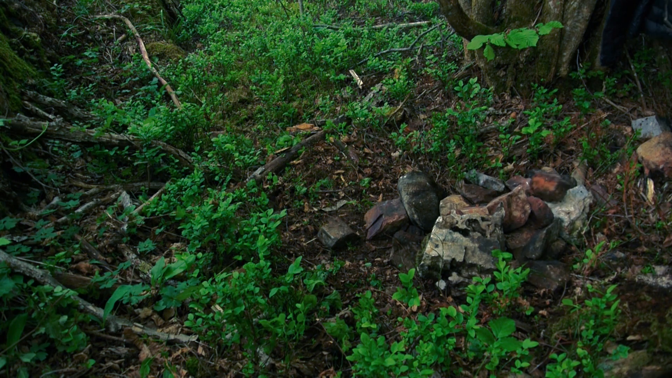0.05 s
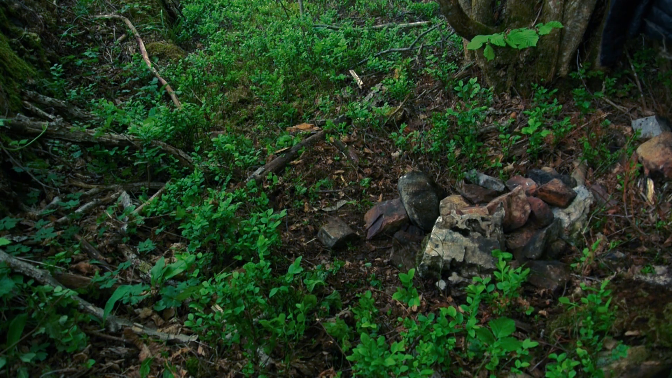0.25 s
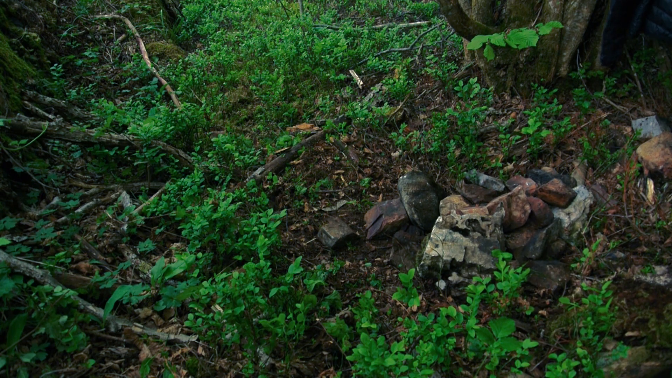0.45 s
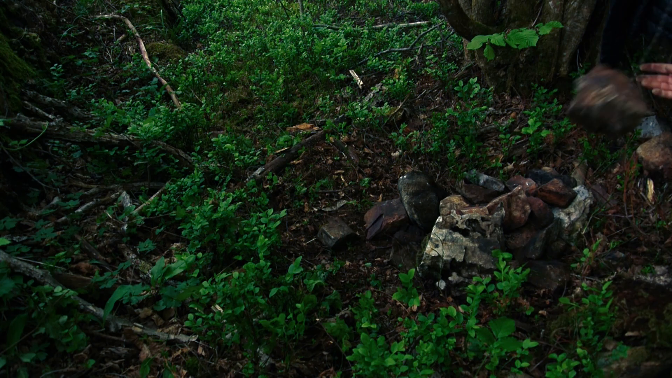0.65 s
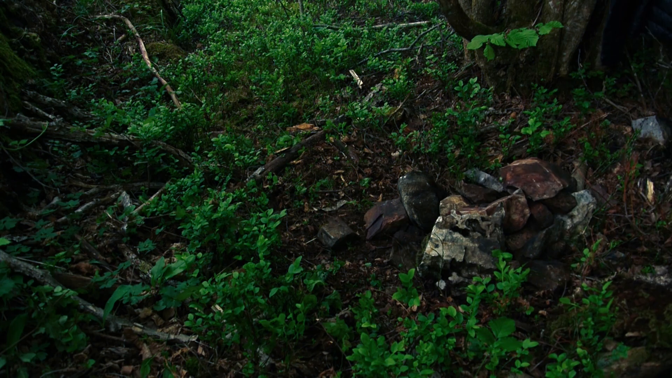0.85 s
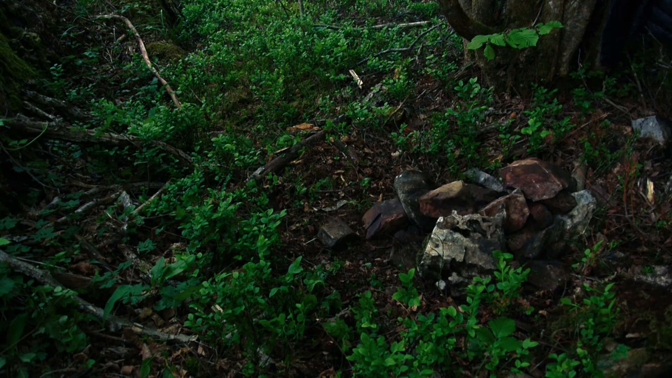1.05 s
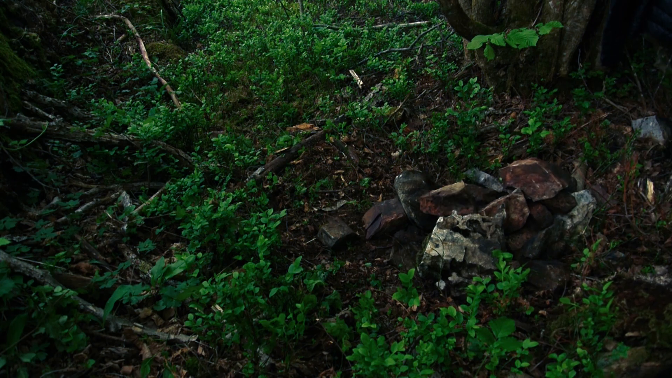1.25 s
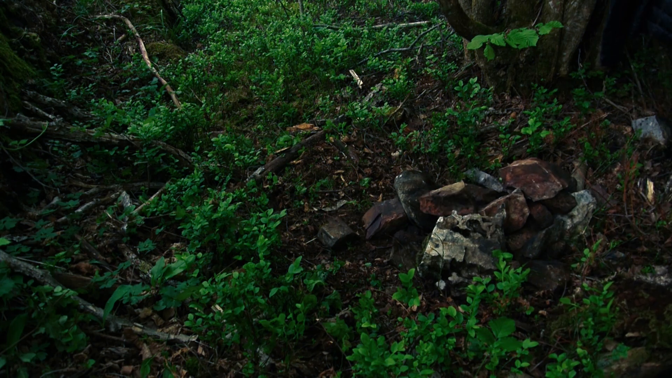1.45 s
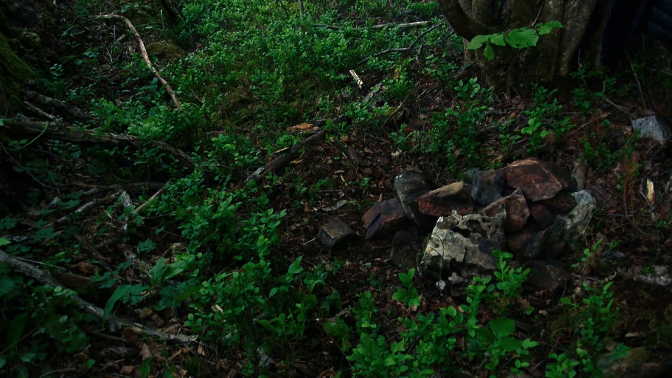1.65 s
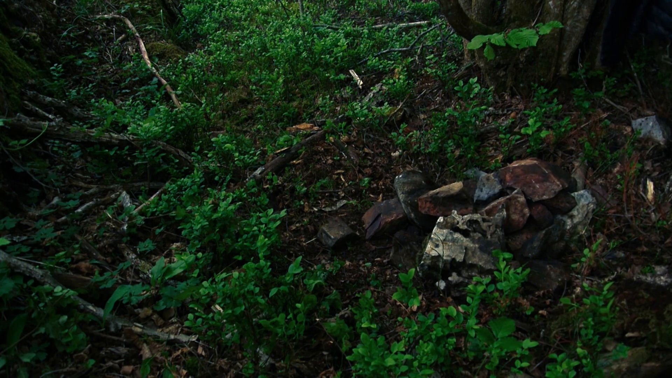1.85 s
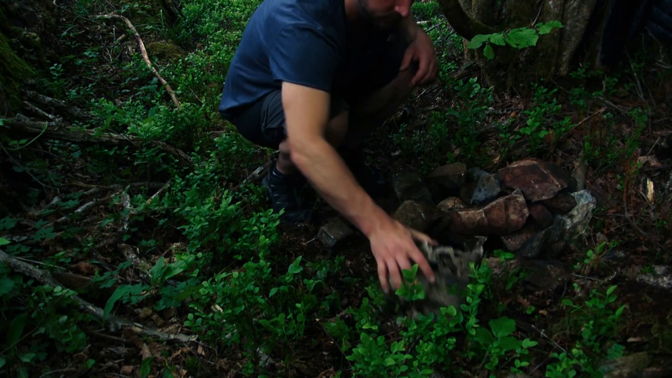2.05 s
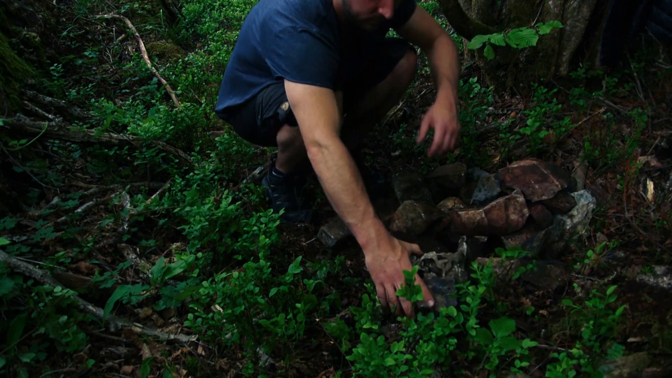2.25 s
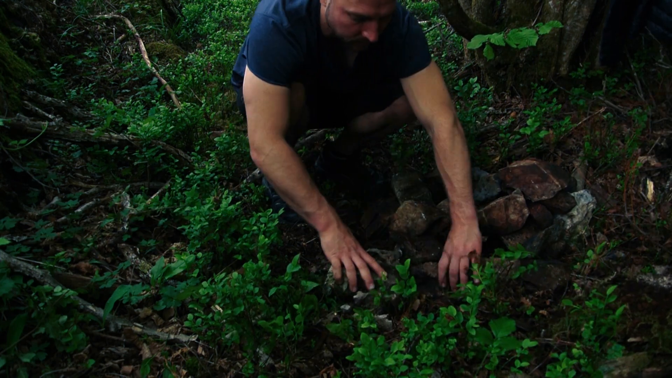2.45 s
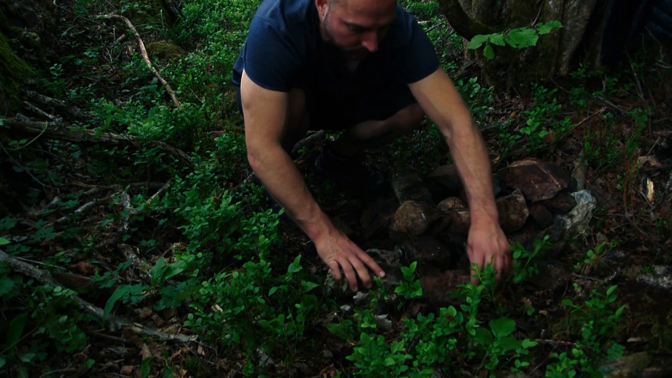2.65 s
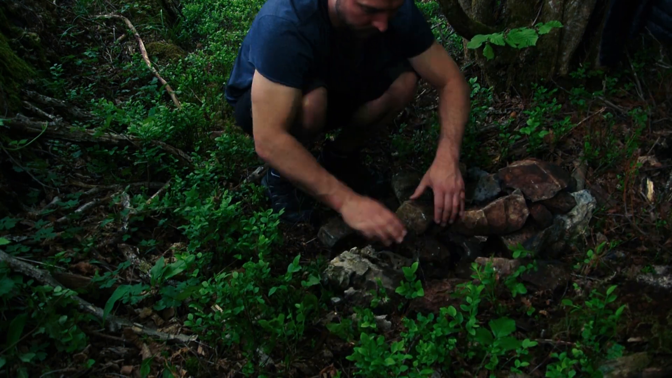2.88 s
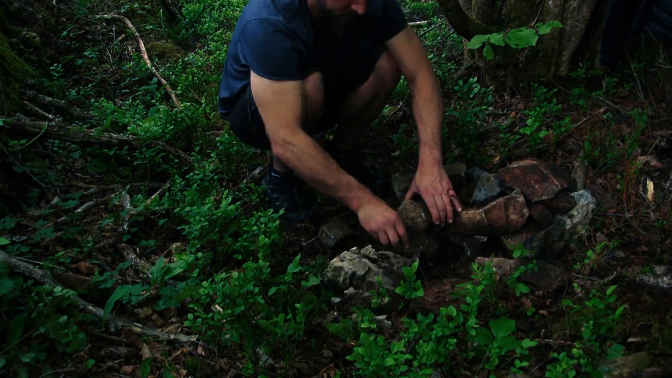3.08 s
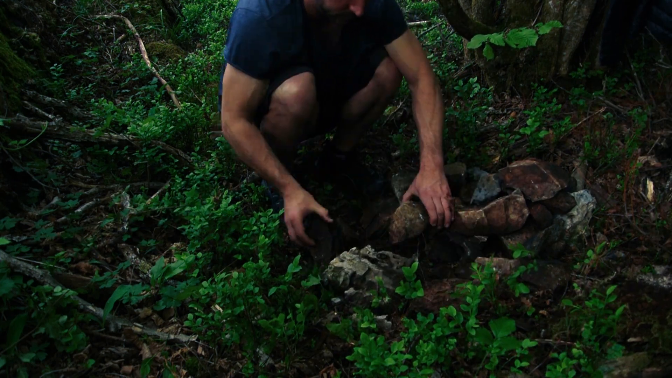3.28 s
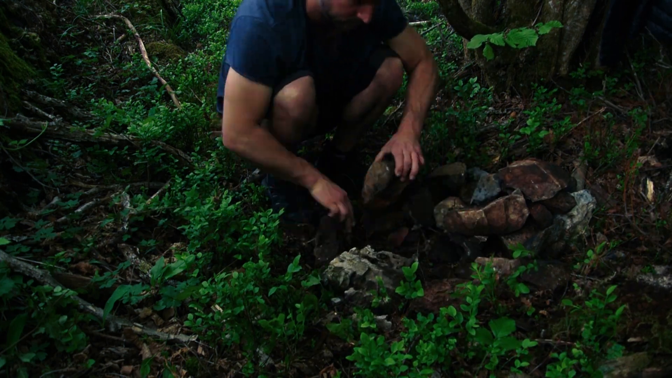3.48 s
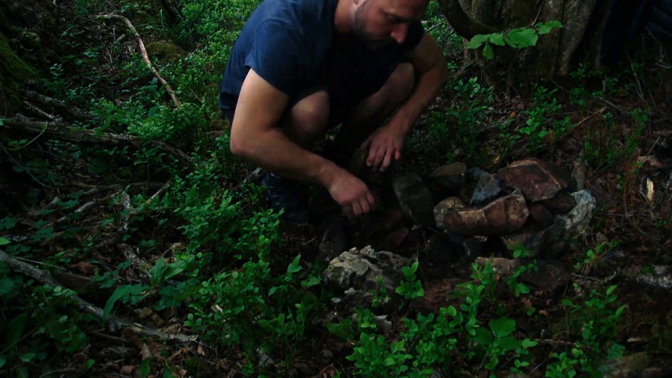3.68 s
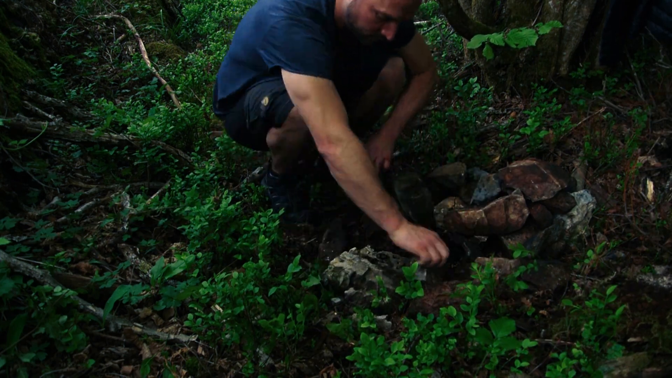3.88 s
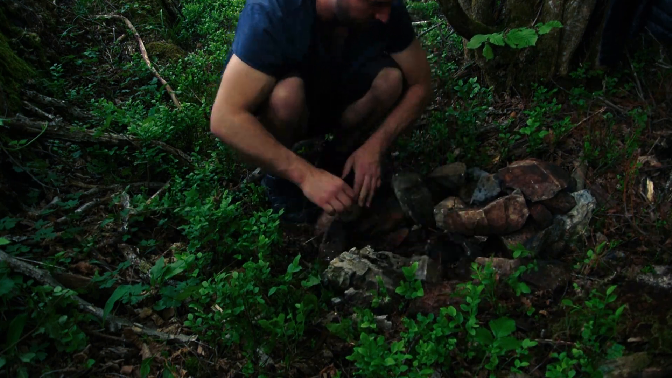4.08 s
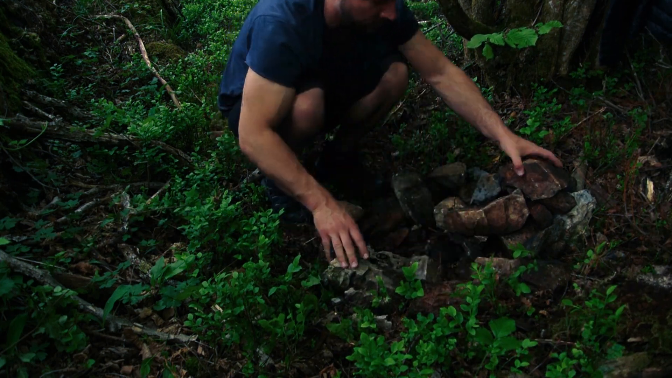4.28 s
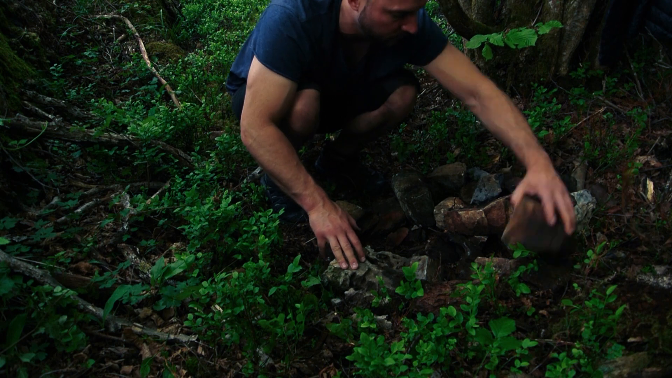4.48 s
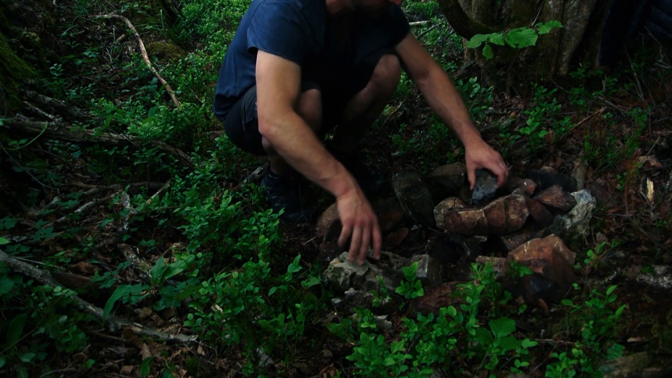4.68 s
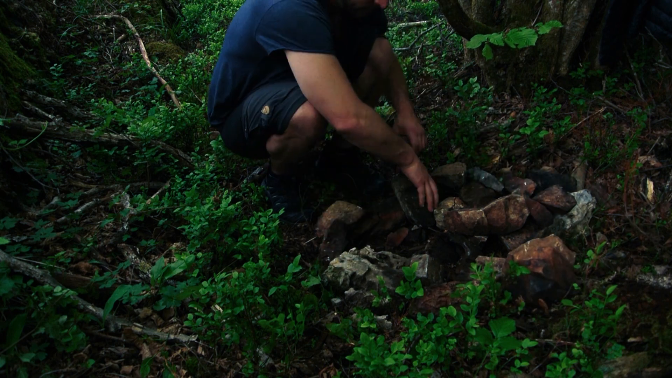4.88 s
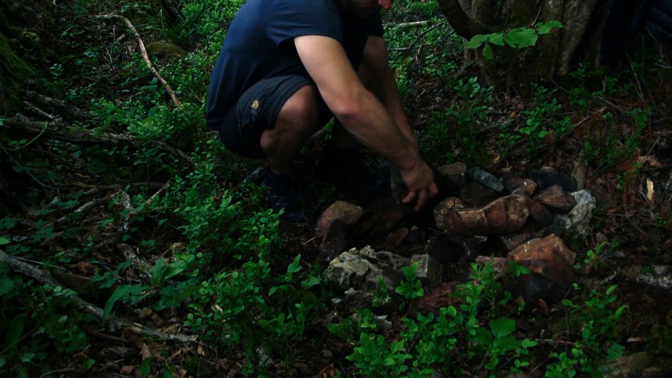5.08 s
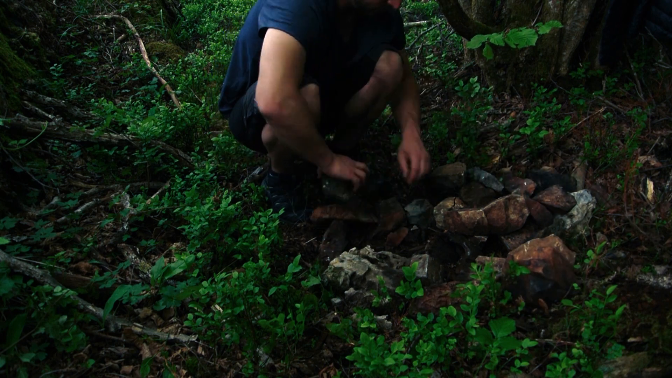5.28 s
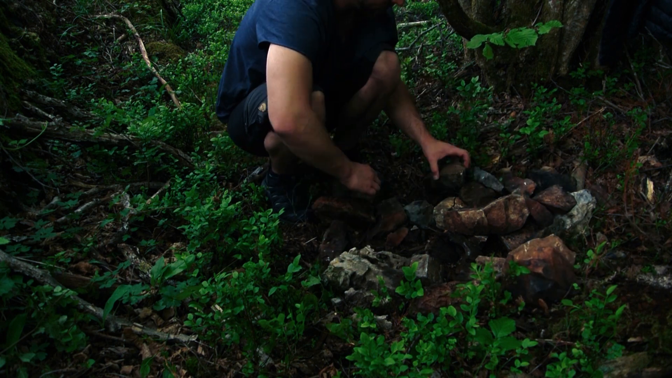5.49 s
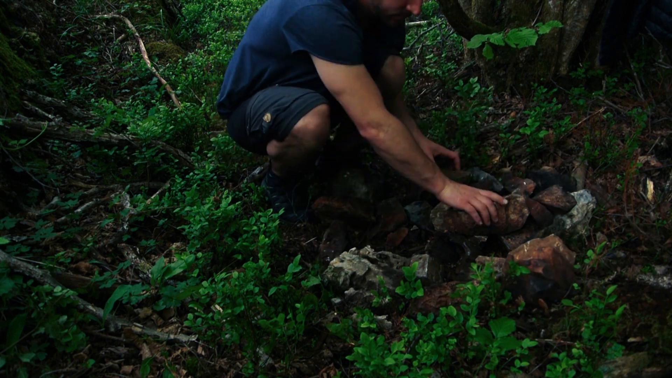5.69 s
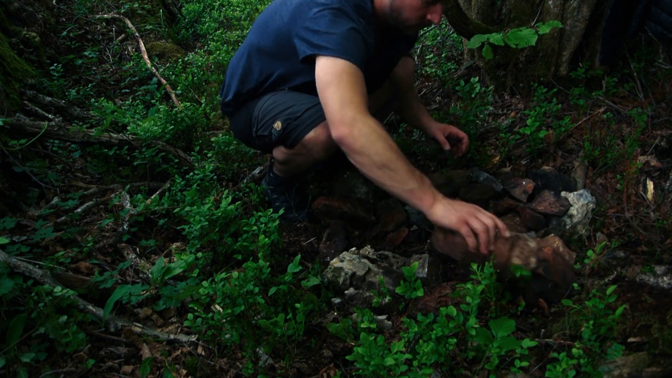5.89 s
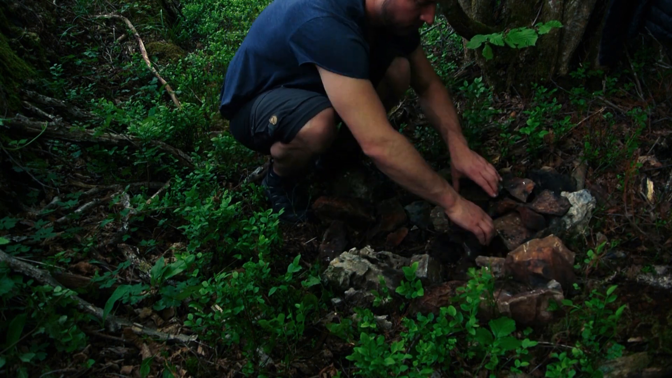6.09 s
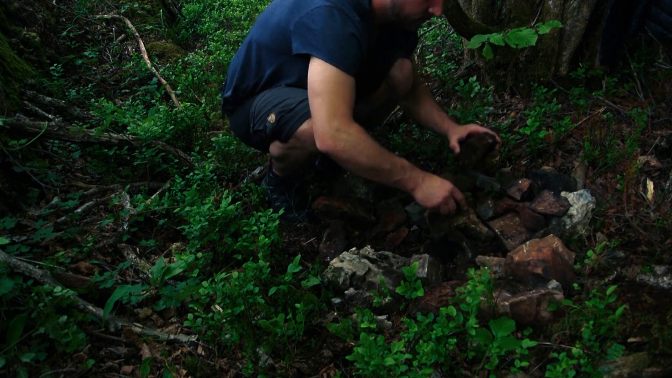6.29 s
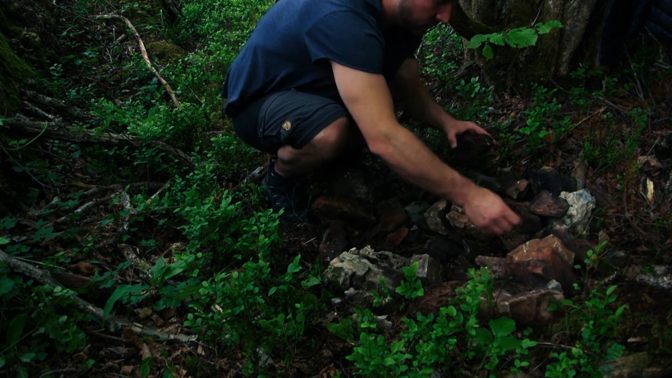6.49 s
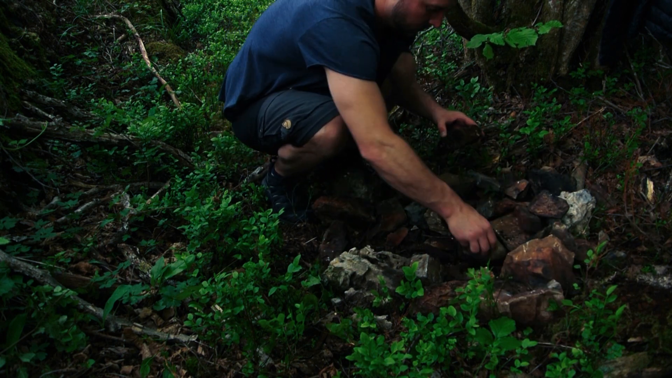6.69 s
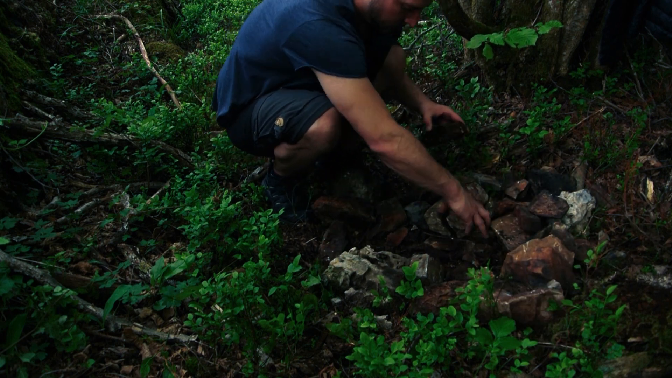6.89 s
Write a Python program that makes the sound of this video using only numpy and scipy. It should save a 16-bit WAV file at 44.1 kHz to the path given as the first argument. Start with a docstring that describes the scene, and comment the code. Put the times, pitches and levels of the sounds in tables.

```python
"""Stones are tossed and set onto a pile on a forest floor: damped rings and grit, a few thumping the soil.
A hard knock opens, dry leaves swish in grains of noise, and a songbird starts gliding whistles to the left.
Far birds sing uneven syllables amid knocks and faint stirring; later a high buzzy trill swells note by note,
each note sliding up from a slightly lower start. Near the end come a heavy knock, a dry rattle of down-sweeps
and a last flurry of song. Trees scatter it into noisy tails over a soft hiss with a wandering rumble."""
import sys
import numpy as np
from scipy import signal
from scipy.fft import rfft, irfft, next_fast_len
from scipy.io import wavfile
from scipy.ndimage import uniform_filter1d

SR = 44100
rng = np.random.default_rng(int(sys.argv[2]) if len(sys.argv) > 2 else 0)


def int16_out(signal):
    """Quantize to a 16-bit WAV file."""
    q = np.round(np.clip(np.atleast_2d(signal).T, -1, 1) * 32767)
    wavfile.write(sys.argv[1], SR, q.astype(np.int16))


N = 306054  # samples

# colour of the air's hiss and rumble: freq_hz, level_db
AIR_COLOUR = [(12, -28), (20, -4.5), (130, -12.5), (163, -12.5), (357, -13.5), (388, -13.5), (542, -13),
              (1060, -17.5), (1330, -17.5), (1570, -18.5), (3530, -20), (3840, -18.5), (5230, -21.5),
              (16000, -24)]
AIR_DB = -48

# phrases of birds deeper in the wood: start_s, length_s, start_hz, end_hz, peak_db
FAR_PHRASES = [(1.16, 0.21, 3280, 2950, -44.5), (2.46, 0.05, 3550, 2800, -37),
               (2.62, 0.2, 3520, 3300, -48.5), (2.94, 0.18, 2900, 3120, -47), (3.1, 0.3, 3820, 3620, -47),
               (3.38, 0.38, 3420, 3380, -48.5), (3.75, 0.22, 3340, 2920, -43),
               (3.8, 0.5, 2780, 2730, -50.5), (5.82, 0.14, 3300, 3100, -43.5)]

# notes of the near songbird: start_s, length_s, start_hz, turn_hz, end_hz, turn_place (0-1), peak_db
SONG_NOTES = [(0.823, 0.014, 2000, 2850, 3020, 0.45, -26), (0.824, 0.12, 3180, 2420, 2260, 0.33, -28),
              (1.035, 0.023, 4480, 4680, 5040, 0.55, -32), (2.083, 0.022, 4450, 4150, 4000, 0.4, -23),
              (2.102, 0.038, 4350, 2750, 1980, 0.45, -16.5), (2.512, 0.028, 4460, 5250, 5400, 0.55, -27.5),
              (2.515, 0.022, 2700, 2450, 2900, 0.55, -33), (2.53, 0.018, 2600, 4600, 7200, 0.5, -22),
              (2.608, 0.025, 2700, 2420, 2150, 0.5, -38), (2.82, 0.105, 3260, 3050, 2150, 0.62, -41),
              (5.038, 0.028, 3700, 4500, 6200, 0.45, -36), (5.062, 0.05, 6200, 4700, 4250, 0.45, -35.5),
              (6.349, 0.05, 2840, 2780, 2380, 0.55, -19), (6.391, 0.033, 2450, 1650, 1850, 0.6, -23.5),
              (6.418, 0.034, 1750, 2450, 2600, 0.42, -19), (6.497, 0.033, 4400, 3900, 3000, 0.35, -13),
              (6.522, 0.036, 3050, 3750, 5400, 0.45, -15), (6.606, 0.059, 1550, 1960, 1380, 0.33, -27.5),
              (6.715, 0.011, 4260, 2900, 2200, 0.5, -23.5), (6.726, 0.039, 3000, 3200, 1300, 0.22, -13.5),
              (6.803, 0.011, 4200, 5100, 6200, 0.5, -23), (6.812, 0.027, 4150, 4000, 2250, 0.26, -14.5),
              (6.828, 0.064, 2560, 2560, 3700, 0.4, -20)]
# notes that it repeats, same columns: a high slur, and a low scoop answered by a steep flick
SLUR_NOTE = (0.541, 0.023, 5300, 4680, 4480, 0.4, -27)
SCOOP_NOTE = (2.188, 0.023, 1590, 1400, 1820, 0.42, -31.5)
FLICK_NOTE = (2.2165, 0.016, 3000, 1900, 1400, 0.5, -23.5)
THROAT_HZ, THROAT_DB_PER_OCTAVE = 3200, 8  # a note is loudest where it passes the throat's resonance
GLIDE_ROUND = 0.3  # share of a note over which its turn is rounded

# the high buzzy call: evenly spaced notes that slide up, each starting lower and louder than the last
TRILL_START_S, TRILL_EVERY_S, TRILL_NOTE_S = 5.426, 0.122, 0.054
TRILL_HZ, TRILL_RISE_HZ, TRILL_SAG_HZ_PER_S = 7150, 800, 880
TRILL_DB, TRILL_SWELL_DB_PER_S = -38, 17
# a dry rattle of steep down-sweeps, loudest in the middle
RATTLE_START_S, RATTLE_EVERY_S = 6.163, 0.027
RATTLE_DB, RATTLE_FADE_DB_PER_S = -28, 130

# leaves brushed aside: centre_s, half_length_s, level_db
LEAF_SWISHES = [(0.102, 0.029, -44), (0.2, 0.025, -43), (0.282, 0.024, -30), (0.338, 0.027, -24.5),
                (0.409, 0.012, -26), (0.448, 0.015, -44), (0.803, 0.008, -38), (1.055, 0.008, -40),
                (1.396, 0.014, -35.5), (1.453, 0.011, -39), (1.676, 0.021, -39.5), (1.788, 0.014, -44),
                (2.103, 0.012, -32), (2.333, 0.01, -35), (2.381, 0.036, -35.5), (2.821, 0.017, -40.5),
                (3.12, 0.006, -39), (3.244, 0.027, -45), (3.336, 0.015, -41.5), (3.885, 0.02, -45),
                (4.572, 0.008, -34), (5.113, 0.038, -48), (5.284, 0.033, -45), (5.373, 0.017, -42),
                (5.702, 0.015, -44), (6.19, 0.018, -41), (6.31, 0.02, -47), (6.359, 0.011, -40),
                (6.485, 0.014, -36), (6.552, 0.022, -47), (6.835, 0.016, -44)]
# colour of the leaves' hiss: freq_hz, level_db
LEAF_COLOUR = [(100, -12), (500, -16), (1000, -11.5), (3600, -0.5), (7000, 1), (11000, 4.5), (16000, -8.5)]
# broad resonances of the soil's scrape: freq_hz, level_db
SOIL_RESONANCES = [(770, 3), (1190, -11), (2100, -2)]
# soil scrape under a swish of the reference level, and its dB per dB of the leaves
SWISH_REF_DB, SOIL_DB, SOIL_FOLLOWS = -40, -49.5, 0.35
# every knock shakes the leaves nearby; level relative to the knock
JOLT_DELAY_S, JOLT_HALF_S, JOLT_DB = 0.02, 0.02, -72
# faint stirring while hands work
HANDS_START_S, HANDS_END_S, STIRS_PER_S = 2.5, 6.9, 4
STIR_HALF_S, STIR_DB, STIR_SPREAD_DB = 0.02, -51, 2

# stone against stone: time_s, level_db at the ring, ring_hz, other_stone_ring_hz,
# then relative to the ring: hollow_db, body_db, crack_db, grit_db
STONE_KNOCKS = [(0.047, 32.5, 1400, 1250, -14.5, -17, -21, -24),
                (0.0833, 12, 1660, 5440, -18, -5, -10, -13),
                (0.7318, 28.5, 2060, 1000, -25, -14, -18.5, -23),
                (1.0362, 26.5, 2170, 980, -20.5, -22, -16.5, -15),
                (1.049, 16.5, 970, 366, -25, -7, -18, -32), (1.1111, 8, 810, 600, -21, -26, -26, -33),
                (1.6573, 9.5, 1460, 440, -16, -1, -2.5, -5.5),
                (1.7312, 21.5, 1180, 2180, -28, -21, -25, -40), (1.753, 8, 1450, 2220, -15, -8, -20, -24),
                (2.0716, 18, 2550, 1040, -21, -12, -3.5, -24), (2.094, 18, 1020, 4010, -8, -6.5, -18, -9.5),
                (2.381, 2, 1560, 2160, -7, -4, -4, -12), (3.213, 3, 564, 890, -14, -14, -18, -9.5),
                (3.5042, 6.5, 4960, 1920, -23, -22, -6, -13), (3.6558, 1, 1000, 590, -13, -8, -21, -33),
                (4.0937, 20, 900, 470, -7, -6, -9.5, -19.5),
                (4.547, 27.5, 720, 1270, -22, -5.5, -23.5, -35.5),
                (4.6098, 8, 704, 1060, -16, -16, -30, -27), (4.6328, 6, 1970, 1380, -23, -19, -32, -30),
                (5.1968, 4, 460, 655, -3, -5, -20, -21), (5.2814, 3.5, 640, 230, -10, -5, -17, -15),
                (5.712, 3.5, 390, 2640, -16, -1, -25, -22), (5.8127, 3.5, 700, 480, -15, -10, -18, -29),
                (5.962, 32.5, 1105, 1250, -24, -11, -24, -40.5), (6.208, 1, 4520, 930, -19, -9, -2, -8),
                (6.4821, 17.5, 1170, 1750, -21, -6.5, -6, -20), (6.842, 11, 2500, 1230, -28, -22, -8, -29)]
# centres of the broad hollow, body, crack and grit sounds: freq_hz
BROAD_HZ = [300, 900, 3500, 12000]
# weight landing on soil: time_s, level_db
SOIL_THUMPS = [(0.046, 18.5), (0.732, 2), (5.714, -7), (5.964, 7)]
# a thin flake that pings when jolted: time_s, level_db
FLAKE_PINGS = [(1.657, -46), (1.731, -40), (1.752, -37)]
# a firm blow's level and contact time; the time halves for every 38 dB harder
FIRM_DB, FIRM_CONTACT_S, CONTACT_HALVES_DB = 20, 0.0029, 38
# after each blow the stone rocks back once: delay, its relative scatter, level relative to the blow
SETTLE_S, SETTLE_SPREAD, SETTLE_DB = 0.022, 0.2, -26
OTHER_STONE_DB = -6.5  # the stone underneath rings less

TOP_HZ = 15800  # upper limit of the finished sound


def undb(db):
    """Decibels to gain."""
    return 10 ** (np.asarray(db) / 20)


def unit(x):
    """Scale to rms 1."""
    return x / np.sqrt(np.mean(x ** 2))


def sides(left_db):
    """Left and right gains for a level difference."""
    return undb(np.array([[left_db], [-left_db]]) / 2)


def add(out, x, start_s):
    """Mix a short sound in at a time, trimmed to the scene."""
    i = int(round(start_s * SR))
    a, b = max(i, 0), min(i + x.shape[-1], N)
    out[..., a:b] += x[..., a - i:b - i]


def bins(size):
    """Frequencies of a spectrum, kept above zero."""
    return np.maximum(np.fft.rfftfreq(size, 1 / SR), 1)


def contour(points, hz):
    """Gain along (Hz, dB) points on a log axis."""
    f, db = np.transpose(points)
    return undb(np.interp(np.log(hz), np.log(f), db))


def resonance(hz, centre, width):
    """Gain of a steep resonance with a relative width."""
    return 1 / (1 + ((hz / centre - centre / hz) / width) ** 2)


def tint(x, gain_at):
    """Filter by a gain that depends on frequency; rms 1."""
    size = next_fast_len(N)
    spectrum = rfft(x, size) * gain_at(bins(size))
    return unit(irfft(spectrum, size)[..., :N])


def pair(size, likeness):
    """Left and right noise, partly alike."""
    c = np.clip(likeness, 0, 1)
    noise = rng.standard_normal((3, size))
    return np.sqrt(c) * noise[0] + np.sqrt(1 - c) * noise[1:]


def walk(rate):
    """Random wandering that takes new values at a rate in Hz; rms 1."""
    k = max(int(SR / rate), 1)
    steps = np.repeat(rng.standard_normal(N // k + 1), k)
    return unit(uniform_filter1d(steps, k)[:N])


def trees(x, t60_s, onset_s=0.0047):
    """Trunks and foliage scatter a sound into a diffuse tail, different at each side."""
    t = np.arange(SR) / SR
    echo = pair(SR, 0) * undb(-60 * t / t60_s) * (1 - np.exp(-t / onset_s))
    echo /= np.sqrt(np.sum(echo ** 2, axis=1, keepdims=True))
    return signal.fftconvolve(np.atleast_2d(x), echo, axes=1)[:, :N]


def air():
    """A soft steady hiss with a low rumble that wanders, stronger on the left."""
    floor = tint(pair(N, 0.077), lambda hz: contour(AIR_COLOUR, hz))
    low = signal.sosfilt(signal.butter(1, 900, fs=SR, output="sos"), floor)
    wander = undb(.7 * walk(7))
    rumble = low * sides(5.4) * wander
    return undb(AIR_DB) * (floor - low + rumble)


def whistle(hz, db, edge=0.22, waver=0.0058, overtone_db=-38):
    """A nearly pure note that fades in and out, its pitch trembling slightly."""
    u = np.linspace(0, 1, len(hz))
    tremble = unit(uniform_filter1d(rng.standard_normal(len(hz)), size=60))
    phase = 2 * np.pi * np.cumsum(hz * (1 + waver * tremble)) / SR
    fade = np.sin(np.pi / 2 * np.clip(np.minimum(u, 1 - u) / edge, 0, 1)) ** 2
    tone = np.sin(phase) + undb(overtone_db) * np.sin(2 * phase)
    return undb(db) * fade * tone


def far_birds(syllable_hz=26, uneven_db=3, waver=0.025):
    """Distant phrases come as quick uneven syllables with gaps, blurred by the trees."""
    turn = 2 * np.pi * np.cumsum(syllable_hz * undb(2 * walk(10))) / SR
    syllables = np.maximum(np.sin(turn), 0) * undb(1.5 + uneven_db * walk(30))
    phrases = np.zeros(N)
    for start_s, length_s, from_hz, to_hz, db in FAR_PHRASES:
        glide = np.linspace(from_hz, to_hz, int(length_s * SR))
        add(phrases, whistle(glide, db, waver=waver), start_s)
    voice = phrases * syllables
    return voice * undb([[-3], [-14]]) + trees(voice, t60_s=0.6) * undb([[-3], [-10]])


def rattle(length_s=0.011, top_hz=5600, low_hz=3000, count=5):
    """One steep sweep repeated, swelling and fading, smeared by the foliage."""
    out, ages = np.zeros(N), RATTLE_EVERY_S * np.arange(count)
    sweep = np.linspace(top_hz, low_hz, int(length_s * SR))
    for age in ages:
        db = RATTLE_DB - RATTLE_FADE_DB_PER_S * abs(age - ages.mean())
        add(out, whistle(sweep, db, waver=0.05), RATTLE_START_S + age)
    return out * undb([[-1], [-16]]) + trees(out, t60_s=.2) * undb([[-3], [-12]])


def trill(buzz_hz=160, depth_hz=300, throb_db=4, count=6):
    """Notes that slide upward while their pitch and loudness flutter fast."""
    out, t = np.zeros(N), np.arange(int(TRILL_NOTE_S * SR)) / SR
    turn = 2 * np.pi * buzz_hz * t
    for age in TRILL_EVERY_S * np.arange(count):
        base_hz = TRILL_HZ - TRILL_SAG_HZ_PER_S * age + TRILL_RISE_HZ * t / TRILL_NOTE_S
        hz = base_hz + depth_hz * np.cos(turn)
        db = TRILL_DB + TRILL_SWELL_DB_PER_S * age + throb_db * (np.sin(turn) - 1)
        add(out, whistle(hz, db), TRILL_START_S + age)
    return out


def repeated(note, every_s, fall_hz, count):
    """One note sung several times at an even pace, sinking by a fixed step (0 for none)."""
    start_s, length_s, *pitches, turn, db = note
    return [(start_s + k * every_s, length_s, *(np.array(pitches) - k * fall_hz), turn, db)
            for k in range(count)]


def song(notes, waver=0.008):
    """Each note glides to a turning pitch and on to its end, loudest near the throat's resonance."""
    out = np.zeros(N)
    for start_s, length_s, *pitches, turn, db in notes:
        u = np.linspace(0, 1, int(length_s * SR))
        legs = np.interp(u, [0, np.clip(turn, 0, 1), 1], pitches)
        hz = uniform_filter1d(legs, max(int(GLIDE_ROUND * len(u)), 1))
        throat_db = -THROAT_DB_PER_OCTAVE * abs(np.log2(hz / THROAT_HZ))
        add(out, whistle(hz, db + throat_db - throat_db.max(), waver=waver), start_s)
    return out


def birds():
    """Songbird and trill sit to the left; close foliage blurs each note and the wood adds a longer tail."""
    slurs = repeated(SLUR_NOTE, every_s=0.032, fall_hz=130, count=3)
    scoops = repeated(SCOOP_NOTE, every_s=0.076, fall_hz=0, count=4)
    flicks = repeated(FLICK_NOTE, every_s=0.076, fall_hz=0, count=4)
    near, high = song(list(SONG_NOTES) + slurs + scoops + flicks), trill()
    direct = near * undb([[-.5], [-27]]) + high * undb([[0], [-17]])
    foliage = trees(near + high, t60_s=0.077) * undb([[-11], [-27]])
    wood = trees(near * undb(-9) + high * undb(-8), t60_s=0.53) * undb([[0], [-12]])
    return direct + foliage + wood


def strokes():
    """Whatever moves the leaves: clear swishes, the jolt of each knock and faint stirring by the hands."""
    jolts = [(s + JOLT_DELAY_S, JOLT_HALF_S, db + JOLT_DB) for s, db, *_ in STONE_KNOCKS]
    times = np.arange(HANDS_START_S, HANDS_END_S, 1 / STIRS_PER_S)
    chance = rng.uniform(-1, 1, (len(times), 2))
    stirs = [(s + early / STIRS_PER_S / 2, STIR_HALF_S, STIR_DB + STIR_SPREAD_DB * loud)
             for s, (early, loud) in zip(times, chance)]
    return list(LEAF_SWISHES) + jolts + stirs


def litter(crackle_db=1.5, scrape_db=4):
    """Dry leaves hiss in fine grains while the soil under them scrapes lower and rougher."""
    hiss = tint(pair(N, 0) * undb(crackle_db * walk(900)), lambda hz: contour(LEAF_COLOUR, hz))
    scrape = tint(pair(N, 0.067) * undb(scrape_db * walk(200)),
                  lambda hz: sum(undb(d) * resonance(hz, f, 0.99) for f, d in SOIL_RESONANCES))
    # overlapping strokes add up as power
    leaf_power, soil_power = np.zeros(N), np.zeros(N)
    for s, half_s, db in strokes():
        t = np.arange(-3 * half_s, 3 * half_s, 1 / SR)
        stroke = np.exp(-(t / half_s) ** 2)
        soil_db = SOIL_DB + SOIL_FOLLOWS * (db - SWISH_REF_DB)
        add(leaf_power, stroke * undb(db) ** 2, s + t[0])
        add(soil_power, stroke * undb(soil_db) ** 2, s + t[0])
    return np.sqrt(leaf_power) * hiss * sides(-2.0) + np.sqrt(soil_power) * scrape


def blows():
    """Every knock, and the soft second contact as the stone settles."""
    chance = rng.standard_normal(len(STONE_KNOCKS))
    settles = [(s + SETTLE_S * (1 + SETTLE_SPREAD * c), db + SETTLE_DB, *colour)
               for (s, db, *colour), c in zip(STONE_KNOCKS, chance)]
    return list(STONE_KNOCKS) + settles


def contact(length_s, likeness, rise=0.82, skirt_db=-24, skirt=2.9, size=4096):
    """Spectrum of a crowd of tiny collisions that builds up and dies as rough faces bite; even on the whole."""
    t = (np.arange(size) - size // 2) / SR
    age = np.where(t < 0, -t / rise, t) / length_s
    force = np.exp(-age ** 1.04) + undb(skirt_db) * np.exp(-age / skirt)  # a faint, longer skirt
    spectrum = rfft(pair(size, likeness) * force)
    return spectrum / np.sqrt(uniform_filter1d(abs(spectrum) ** 2, size=29))


def stones(ring_width=0.3, flake_hz=6500, flake_t60_s=0.055, size=4096):
    """Each contact rings two damped stones and spits grit; a few knocks also thump the soil."""
    out, hz = np.zeros((2, N)), bins(size)
    for s, db, ring_hz, other_hz, *broad_db in blows():
        length_s = FIRM_CONTACT_S * 2 ** ((FIRM_DB - db) / CONTACT_HALVES_DB)
        ring = resonance(hz, ring_hz, ring_width)
        other = undb(OTHER_STONE_DB) * resonance(hz, other_hz, ring_width)
        # below the hollow sound the level falls away towards 70 Hz
        broad = contour([(70, broad_db[0] - 12.5), *zip(BROAD_HZ, broad_db)], hz)
        colour = np.sqrt(ring ** 2 + other ** 2 + broad ** 2)
        knock = irfft(contact(length_s, likeness=0.19) * colour)
        add(out, undb(db) * knock * sides(-.8), s - size / 2 / SR)
    t = (np.arange(size) - size // 2) / SR
    for s, db in SOIL_THUMPS:
        push = np.exp(-(t / .0012) ** 2)  # the soft ground takes the weight in one short push
        add(out, undb(db) * push / push.sum(), s - size / 2 / SR)
    age = np.arange(size) / SR
    for s, db in FLAKE_PINGS:
        add(out, undb(db - 60 * age / flake_t60_s) * np.sin(2 * np.pi * flake_hz * age), s)
    return out


def scene():
    """Stones and litter close by, birds around, the wood behind."""
    work = stones() + litter()
    work_tail = undb(-33.5) * trees(work, t60_s=0.26)
    return air() + far_birds() + rattle() + birds() + work_tail + work


def record(dry):
    """Anything beyond full scale is clipped flat; then the top is cut steeply."""
    clipped = np.clip(dry, -1, 1)
    top_cut = signal.ellip(8, .1, 50, TOP_HZ, fs=SR, output="sos")
    return signal.sosfiltfilt(top_cut, clipped)


dry = scene()
out = record(dry)
int16_out(out)
```